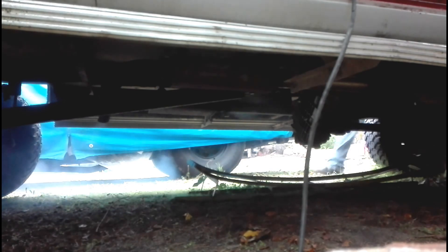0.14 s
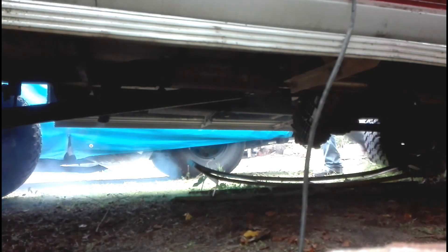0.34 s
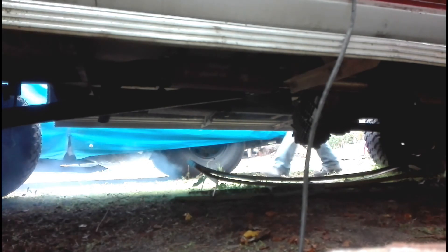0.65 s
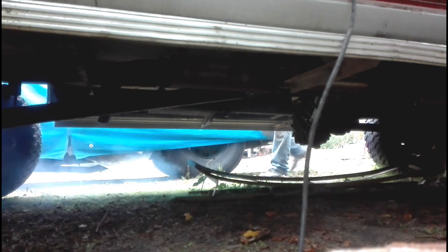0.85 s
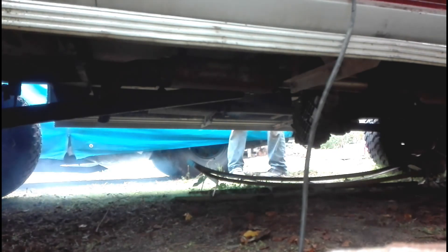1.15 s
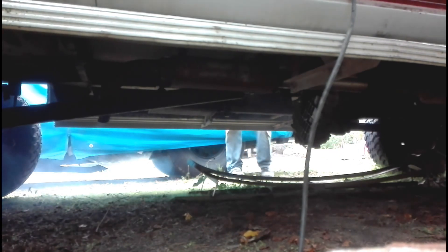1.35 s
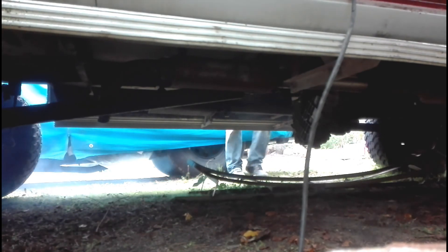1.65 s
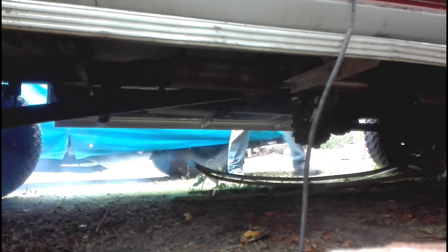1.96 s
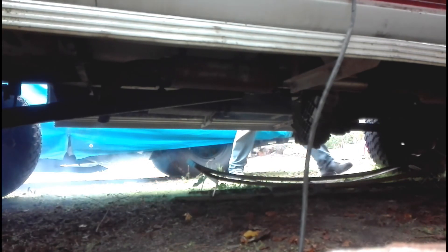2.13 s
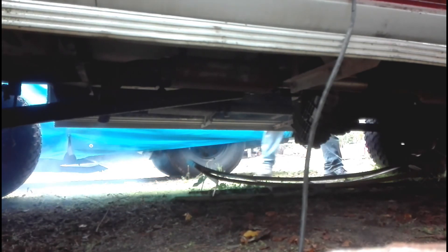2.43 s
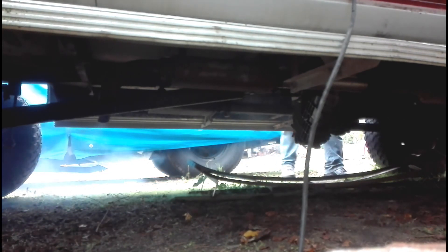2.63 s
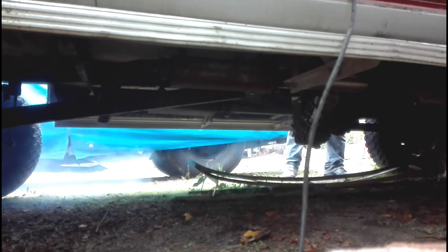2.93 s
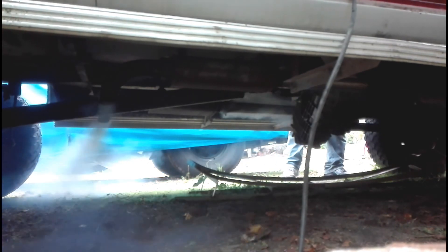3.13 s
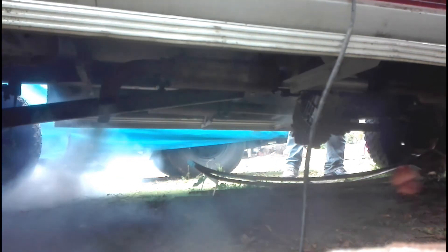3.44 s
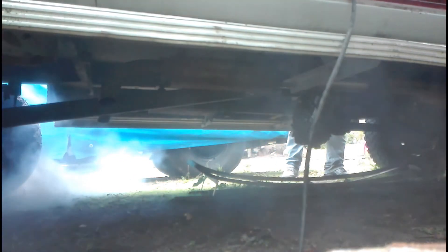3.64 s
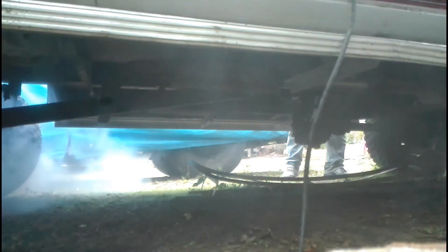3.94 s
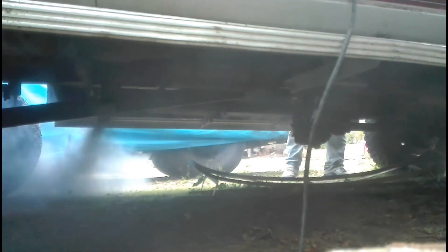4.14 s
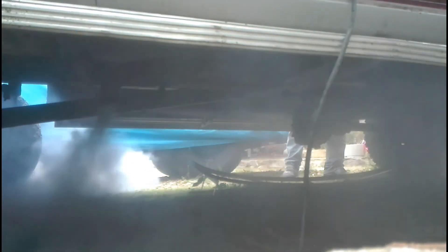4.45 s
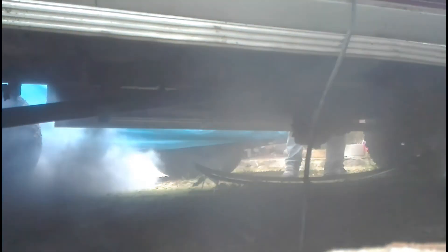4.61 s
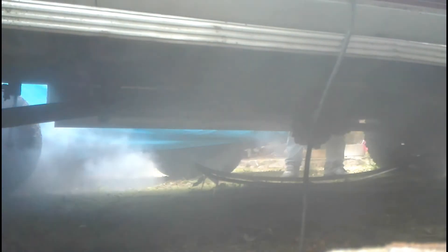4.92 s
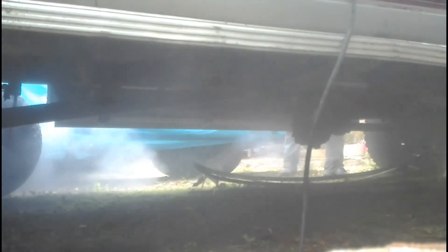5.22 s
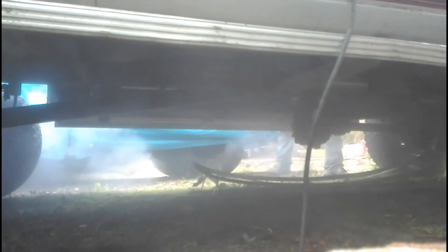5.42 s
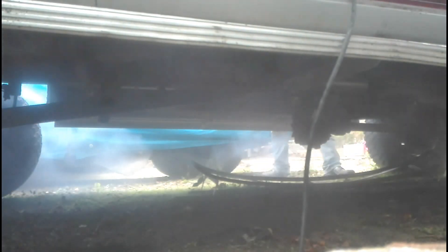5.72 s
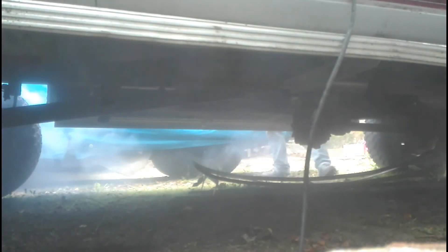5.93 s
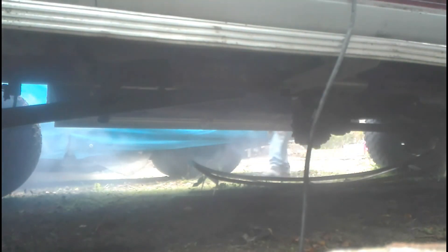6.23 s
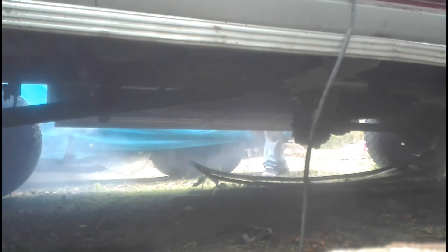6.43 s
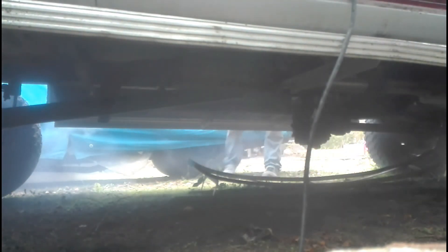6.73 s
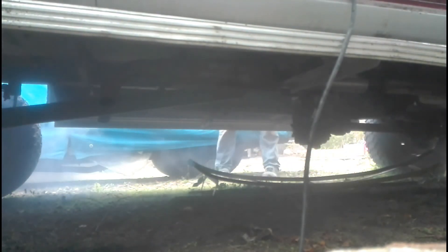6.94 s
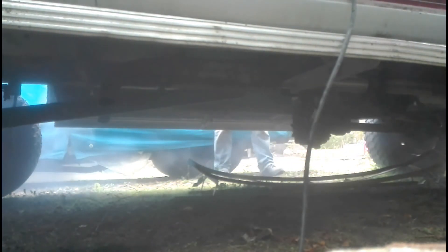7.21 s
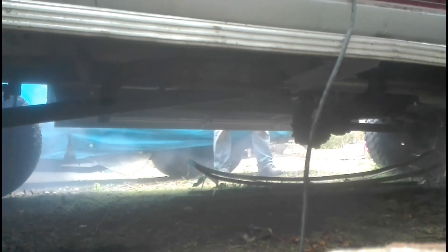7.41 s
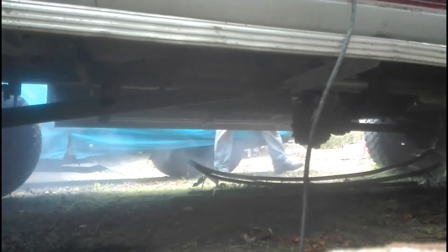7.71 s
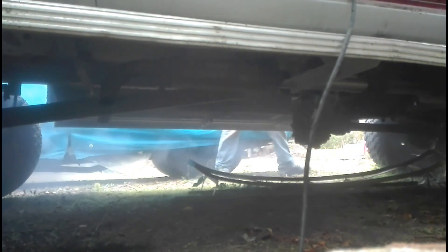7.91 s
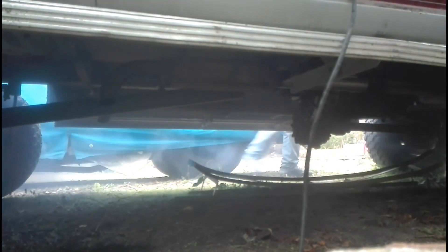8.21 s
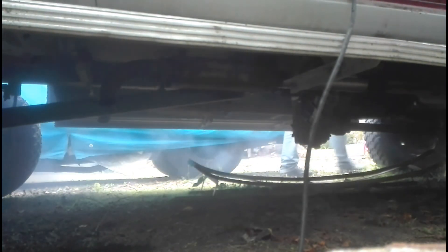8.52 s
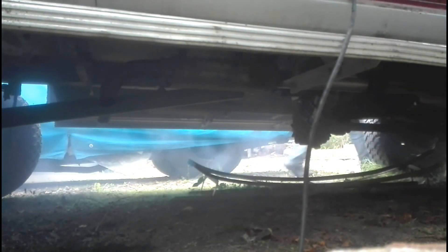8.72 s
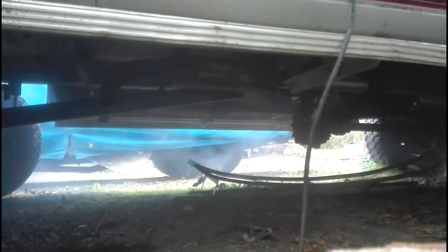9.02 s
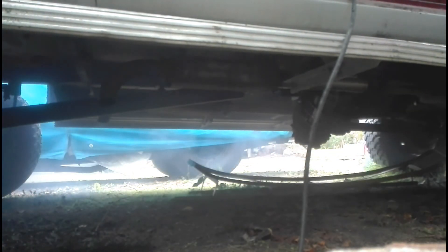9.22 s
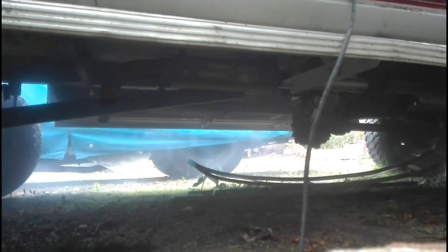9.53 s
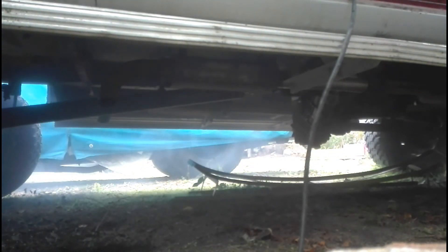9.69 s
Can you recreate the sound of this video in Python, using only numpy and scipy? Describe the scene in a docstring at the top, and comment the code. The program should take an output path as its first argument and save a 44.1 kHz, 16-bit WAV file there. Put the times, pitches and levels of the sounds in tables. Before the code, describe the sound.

A big diesel engine idles outdoors with a deep uneven boom and clatter, is revved hard twice with cracking exhaust, then settles to a quieter idle.

```python
"""A deep, loping boom comes first: a diesel V8 idling outdoors, heard from under the truck and revved twice.
The boom is a tone at the firing rate, made uneven by its cylinders; noise bursts for knocks and ticks ring the
engine at the same places of every cycle. Under throttle, filtered impulses blast from the pipe and shaped noise
hisses; then the engine coasts down on wavering tones and a thin sigh of air.
The blasts push the recorder's gain down and it stays there for seconds, so the last idle sounds quieter."""
import sys
import numpy as np
from scipy import signal
from scipy.fft import rfft, irfft
from scipy.io import wavfile
from scipy.ndimage import uniform_filter1d, minimum_filter1d

SR = 44100
rng = np.random.default_rng(int(sys.argv[2]) if len(sys.argv) > 2 else 0)


def transcribe(signal):
    """Save signal, clipped to [-1, 1], as a 16-bit WAV file at the path in sys.argv[1]."""
    frames = np.atleast_2d(signal).T
    limited = np.clip(frames, -1, 1)
    pcm = np.round(limited * 32767).astype(np.int16)
    wavfile.write(sys.argv[1], SR, pcm)


N = 434826
TIME = np.arange(N) / SR


def gain_of(db):
    """Turns decibels into an amplitude factor."""
    return 10 ** (np.asarray(db) / 20)


def evened(x):
    """Brings a layer to an rms of 1."""
    return x / np.sqrt(np.mean(x ** 2) + 1e-20)


def steadied(x, size=12800):
    """Holds the rms near 1 over a few engine cycles; size is in samples."""
    return x / np.sqrt(abs(uniform_filter1d(x ** 2, size)) + 1e-12)


def curves(rows):
    """The columns of a table, joined by straight lines in time."""
    s, *columns = np.transpose(rows)
    return [np.interp(TIME, s, c) for c in columns]


def ramp(start_s, length_s):
    """Goes from 0 to 1 in a straight line."""
    return np.clip((TIME - start_s) / max(length_s, 1e-3), 0, 1)


def wander(rate_hz):
    """Smooth chance of rms 1: noise that loses its content above rate_hz."""
    size = 2 ** 19
    spectrum = rfft(rng.standard_normal(size))
    smoothing = 1 + (np.fft.rfftfreq(size, 1 / SR) / rate_hz) ** 4
    return evened(irfft(spectrum / smoothing)[:N])


def colour(x, points, modes=(), size=8192):
    """A causal (minimum-phase) filter from a smooth spectrum with resonances on top."""
    hz = abs(np.fft.fftfreq(size, 1 / SR))
    f, db = np.transpose(points)
    gain = gain_of(np.interp(np.log(hz + 1), np.log(f), db))
    for centre, width, peak_db in modes:
        resonance = (gain_of(peak_db) ** 2 - 1) / (1 + (2 * (hz - centre) / width) ** 2)
        gain = gain * np.sqrt(1 + resonance)
    ring = np.fft.ifft(np.exp(np.conj(signal.hilbert(np.log(gain))))).real
    return signal.oaconvolve(x, ring[:size // 2])[:N]


def cut(x, hz, kind, order=4):
    """A Butterworth filter that keeps the low or the high side."""
    sos = signal.butter(order, min(hz, SR / 2 - 1), kind, fs=SR, output="sos")
    return signal.sosfilt(sos, x)


# the governor's idle speed: start_s, speed_firings_per_s
IDLE_SPEED = [(0, 57.28), (.6, 55.4), (2.8, 55.72), (3.8, 52.61), (5.2, 54.3), (7.2, 54.32), (8, 54.72),
              (9.9, 53.37)]
# revs: opens_s, top_speed_s, back_at_idle_s, idle_fuel_returns_s, top_speed_firings_per_s,
# opening_s, closing_s, blast_db
REVS = [(2.92, 3.173, 3.736, 3.76, 130.5, .1, .045, 1), (3.914, 4.348, 5.039, 5.155, 181.7, .07, .1, 0)]
CLIMB_EASE = 1.212  # the climb eases near the top: exponent, 1 = a straight line
# the throttle starts to close this long before top speed; the governor restores fuel within CATCH_S
COAST_LEAD_S, CATCH_S = 0.046, 0.056


def engine():
    """Each rev climbs under throttle and coasts without fuel: speed, throttle 0-1, coasting 0-1, blast force."""
    idle, = curves(IDLE_SPEED)
    speed, pull, coast, force = idle.copy(), *np.zeros((3, N))
    for opens, shuts, idles, fuelled, top, opening, closing, blast_db in REVS:
        climb = 1 - (1 - ramp(opens, shuts - opens)) ** CLIMB_EASE
        fall = 1 - ramp(shuts, idles - shuts)
        speed += (top - idle) * climb * fall
        closed = ramp(shuts - COAST_LEAD_S, closing)
        throttle = ramp(opens, opening) * (1 - closed)
        pull += throttle
        force += gain_of(blast_db) * throttle
        coast += closed * (1 - ramp(fuelled - CATCH_S / 2, CATCH_S))
    return speed, pull, coast, force


# the cylinders in firing order: lead_firing_intervals, idle_push_db, throttle_blast_db
CYLINDERS = [(0.12, 2, -1.5), (0.12, 0, -21), (0.071, 2, -14.5), (0.027, -4.5, 1.5), (0.11, -1.5, -9),
             (0.1, -3, 1), (0.12, 0.3, -6.5), (0.078, -1.9, -20.5)]


def by_cylinder(firings, values):
    """One value for each cylinder, joined smoothly round the cycle."""
    count = len(values)
    smooth = signal.resample(values, count * count * count)
    places = np.linspace(0, count, len(smooth), endpoint=False)
    return np.interp(firings % count, places, smooth, period=count)


def strikes(firings, blows, scatter_db):
    """One impulse for each blow (place in the cycle, dB), in every cycle."""
    out = np.zeros(N)
    for place, db in blows:
        places = place + np.arange(0, firings[-1] - len(CYLINDERS), len(CYLINDERS))
        at = np.minimum(np.searchsorted(firings, places), N - 1)
        out[at] += gain_of(db + scatter_db * rng.standard_normal(N)[:len(at)])
    return out


# resonances of the exhaust pipe: pitch_hz, width_hz, level_db
PIPE_MODES = [(59.6, 75, 8.5), (123, 23, 4), (222, 39, 11.5)]
# exhaust tones while coasting: multiple_of_cycle_rate, level_db (re the firing tone, before the pipe)
COAST_TONES = [(2, -16), (3, -1), (4, -18), (5, -10), (7, -22), (11, -22), (13, -25.5), (14, -21),
               (15, -19.5), (16, -10.5), (17, -13), (18, -18.5), (21, -24)]
COAST_ROUGH = .36  # how much the exhaust tones waver while coasting, 0-1


def boom(firings, speed, coast, overtone_db=-28, coast_db=-2.5):
    """The firing tone lopes; in coasting, tones of the unequal banks swell as they cross the pipe's resonances."""
    lead, push_db, _ = np.transpose(CYLINDERS)

    def pipe(hz):
        """The pipe's gain for a tone."""
        return gain_of(sum(db / (1 + (2 * (hz - centre) / width) ** 2) for centre, width, db in PIPE_MODES))

    lope = gain_of(by_cylinder(firings, push_db)) * (1 + .04 * wander(12))
    turn = 2 * np.pi * (firings + by_cylinder(firings, lead))
    unsteady = wander(12.0)
    tone = np.cos(turn) + gain_of(overtone_db) * np.sin(2 * turn)
    out = pipe(speed) * lope * tone * (1 + coast * COAST_ROUGH / 2 * unsteady)
    for (multiple, db), (phase, shift) in zip(COAST_TONES, rng.random((len(COAST_TONES), 2))):
        ratio = round(multiple) / len(CYLINDERS)
        waver = 1 + COAST_ROUGH * np.roll(unsteady, int(shift * N))
        size = coast * gain_of(db) * pipe(ratio * speed) * waver
        out += size * np.cos(2 * np.pi * (ratio * firings + phase))
    return np.sqrt(2) * gain_of(coast_db * coast) * out / pipe(IDLE_SPEED[1][1])


# the pipe's response to a blast: pitch_hz, level_db
BLAST_PIPE = [(20, -13.5), (40, -8.5), (60, 7.5), (80, 2.5), (105, -4.5), (135, -10), (165, -11.5),
              (195, -16), (235, -13), (300, -23), (350, -35.5), (400, -25.5), (440, -38), (490, -24),
              (600, -38.5), (900, -46), (2000, -59), (5000, -89)]
BLAST_LEAD = 0.12  # a blast leaves this many firing intervals ahead of its cylinder's place


def blasts(exhausts):
    """Under throttle each firing sends a steep pressure front down the pipe."""
    peak = abs(colour(signal.unit_impulse(N), BLAST_PIPE)).max()
    return colour(exhausts, BLAST_PIPE) / peak


# the unevenly spaced firings of each bank thump the pipe:
# place_firing_intervals, centre_pitch_hz, width_firing_intervals, level_db (relative)
THUMPS = [(1, 113, 0.35, -2.5), (2.95, 108, 0.43, 4.5), (4.65, 108, 0.39, 0), (6, 116, 0.19, 0.5),
          (1.45, 221.6, .26, 1.5), (2.5, 222, 0.16, -6.5), (3.4, 222, 0.34, -12.5), (6.5, 222.6, 0.3, 1),
          (7.6, 215, 0.23, -6)]


def thumps(firings, scatter_db, fall):
    """Rounded bursts at the pipe's resonances, at fixed places of the cycle, give the idle its chug and gallop."""
    out = np.zeros(N)
    for place, hz, width, db in THUMPS:
        # distance from the nearest thump, in firing intervals
        away = (firings - place + len(CYLINDERS) / 2) % len(CYLINDERS) - len(CYLINDERS) / 2
        since = TIME - np.interp(firings - away, firings, TIME)
        swell = np.exp(-(away / width) ** 2 / 2)
        out += gain_of(db) * swell * np.cos(2 * np.pi * hz * since * (1 - fall * away))
    return evened(out * gain_of(scatter_db * wander(22)))


# spectrum of the low puffs in the pipe: pitch_hz, level_db (relative)
PUFF_SPECTRUM = [(20, -14), (45, -32), (110, 0), (165, 2.5), (225, 0.5), (290, -2), (370, -6), (415, -5),
                 (445, -10.5), (485, -9.5), (600, -19.5), (900, -9.5), (2000, -75)]
COAST_PUFFS_DB = -14


def puffs(firings, pull, coast, idle_db=-25, pull_db=-17.0, opening=.1, length=0.98, steady=0.79):
    """Each exhaust valve lets out a low, turbulent puff; opening and length are in firing intervals."""
    gate = steady + np.exp(-((firings - opening) % 1) / length)
    size = (1 - pull - coast) * gain_of(idle_db)
    size = size + pull * gain_of(pull_db) + coast * gain_of(COAST_PUFFS_DB)
    return size * evened(colour(gate * rng.standard_normal(N), PUFF_SPECTRUM))


# hard bangs in the exhaust at full throttle: start_s, crack_db, pipe_ring_db (crack relative)
BANGS = [(3.032, -5, -30), (3.064, -9, -26), (3.122, -8, -17), (3.137, -20, -19), (4.072, -7, -28),
         (4.194, -1, -8), (4.246, 1, -7), (4.293, -1, -12)]
# spectrum of their crack: pitch_hz, level_db (relative)
BANG_SPECTRUM = [(60, -11), (150, 0.5), (300, -11), (490, -16), (640, -10), (1000, -2.5), (1350, 8.5),
                 (2200, -9), (5000, -28)]


def bangs(decay_s=0.0039, turbulence=0.55, spike=0.85, spike_s=0.00074, ring_hz=486, ring_s=.012):
    """The fiercest firings crack, a pressure spike in a burst of noise, and leave the pipe ringing hollowly."""
    noise, t = rng.standard_normal(N), TIME[:4096]
    burst, ring = np.zeros((2, N))
    for s, crack_db, ring_db in BANGS:
        part = slice(round(s * SR), round(s * SR) + len(t))
        crack = turbulence * noise[part] * np.exp(-t / decay_s) - spike * np.exp(-t / spike_s)
        burst[part] += gain_of(crack_db) * crack
        ring[part] -= gain_of(ring_db) * np.exp(-t / ring_s) * np.sin(2 * np.pi * ring_hz * t)
    return colour(burst, BANG_SPECTRUM) / np.std(colour(noise, BANG_SPECTRUM)) / 2 + ring


# the pipe's bark under throttle: pitch_hz, level_db (relative)
BARK_SPECTRUM = [(250, -10), (400, -6), (440, -1), (490, 4), (590, -17), (700, -8), (830, 5.5),
                 (1100, -1.5), (1400, 6.5), (2000, 0.5), (3000, -21.5)]
# gas rushing from the pipe: pitch_hz, level_db (relative)
RUSH_SPECTRUM = [(500, -32), (900, 7), (2500, 5.5), (4000, 7.5), (6000, 5.5), (8000, 1.5), (10000, -7.5),
                 (12000, -14.5), (14000, -24)]


def rush(exhausts, spectrum, swell_s=0.0038, steady=0.4, gust_db=1.5):
    """Each blast drags a turbulent jet of gas out of the pipe."""
    t = TIME[:2048]
    jets = evened(signal.oaconvolve(exhausts, t * np.exp(-t / swell_s))[:N])
    gusts = gain_of(gust_db * wander(66))
    return evened(colour((steady + jets) * gusts * rng.standard_normal(N), spectrum))


# the knocks and valve clacks of one cycle:
# place_firing_intervals, low_clank_db, bright_clack_db, tick_db (relative)
KNOCKS = [(.4, -12, -1, -3), (.85, -1, 2, -4), (1.75, 0, 3, -1), (2.25, -4, 1.5, -15), (2.9, -9, -9, -3),
          (3.8, -9, -6, -10), (4.35, -4, -1, -12), (4.7, -4, -1, 0), (5.0, 2, -2, -4), (5.25, -3, 3.5, -4),
          (5.5, -12, 0, -1), (5.85, -7, 3, -1), (6.35, 0, 0, -12), (6.7, -1, -1, -5), (7.2, 1, 1, -7),
          (7.85, -6, 2, -6)]


def knocks(firings, levels_db, decay_s, bed, scatter_db, alike, jitter_s=.0003, rise_s=0.0022, size=1500):
    """Knocks return once a cycle as short bursts, partly the same each time, over a bed of loose rattle."""
    out, t = np.zeros(N + size), np.arange(size) / SR
    alike = np.clip(alike, 0, 1)
    for place, db in zip(np.transpose(KNOCKS)[0], levels_db):
        places = place + np.arange(0, firings[-1], len(CYLINDERS))
        early, force = rng.standard_normal((2, len(places)))
        start_s = np.interp(places, firings, TIME) + jitter_s * early
        starts = np.clip(start_s * SR, 0, N).astype(int)
        same = alike * rng.standard_normal(size)
        bursts = same + np.sqrt(1 - alike ** 2) * rng.standard_normal((len(places), size))
        # a blow excites all frequencies evenly
        bursts = irfft(np.exp(1j * np.angle(rfft(bursts * np.exp(-t / decay_s)))))
        bursts *= gain_of(db + scatter_db * force)[:, None] * (1 - t / t[-1]) * (1 - np.exp(-t / rise_s))
        np.add.at(out, starts[:, None] + np.arange(size), bursts)
    return evened(out[:N]) + bed * rng.standard_normal(N)


# colour of the engine's metal: pitch_hz, level_db (relative)
METAL_SPECTRUM = [(300, -19), (600, -31), (760, -20), (1000, -5.5), (1350, -1), (1750, -3.5), (2150, -2.5),
                  (2650, -15), (3500, -35), (5000, -45), (9000, -49)]
# its resonances: pitch_hz, width_hz, level_db
METAL_MODES = [(786, 35, 6.5), (1055.5, 20, 8.5), (1206, 6.1, 8.5), (1302, 24, 9), (1470, 43, 6),
               (1627, 39, 6), (1735, 35, 7.5), (1773, 20, -9.5), (2845, 22, 2), (3810, 21, 5.5),
               (4150, 47, 6.5), (4450, 48, 3.5), (5910, 36, 4.5), (7100, 110, 2)]


def clatter(firings, split_hz=1450, clack_db=0):
    """Combustion knock and loose parts ring the block and its covers."""
    _, low_db, high_db, _ = np.transpose(KNOCKS)
    clank = knocks(firings, low_db, decay_s=.011, bed=.7, scatter_db=.8, alike=.7)
    clack = knocks(firings, high_db, decay_s=.007, bed=.5, scatter_db=2, alike=.7)
    blows = cut(clank, split_hz, "low", order=8)
    blows = blows + gain_of(clack_db) * cut(clack, split_hz, "high", order=8)
    return steadied(colour(blows, METAL_SPECTRUM, METAL_MODES))


# the hardest knocks of a cycle ring steel covers:
# place_firing_intervals, pitch_hz, swell_s, level_db (relative)
COVER_RINGS = [(4.92, 1304, .005, 0), (6.4, 1304, .005, -7.5), (7.13, 1304, .0045, -2.5),
               (5.25, 1700, .0026, -2.5), (7.26, 1700, .0024, -4.5), (7.87, 1700, .0024, -9)]


def cover(firings, level_db=-5):
    """Hard knocks ring the steel covers, a low stroke and a higher partner; each swells quickly and dies away."""
    t, out = TIME[:2048], np.zeros(N)
    for place, hz, swell_s, db in COVER_RINGS:
        ring = t / swell_s * np.exp(-t / swell_s) * np.sin(2 * np.pi * hz * t)
        out += signal.oaconvolve(strikes(firings, [(place, db)], scatter_db=.7), ring)[:N]
    return gain_of(level_db) * evened(out)


# injector and valve ticks: pitch_hz, level_db (relative)
TICK_SPECTRUM = [(1500, -4), (2600, 4.5), (3800, 0), (5000, -3.5), (6000, -3.5), (8000, -7.5),
                 (10000, -13.5), (12000, -21.5), (14000, -22)]


def ticks(firings, split_hz=4800, loose_db=-6):
    """Injectors and valves tick softly, scattered between ground and chassis, and shake loose parts."""
    levels_db = np.transpose(KNOCKS)[3]
    middle = knocks(firings, levels_db, decay_s=.018, bed=.8, scatter_db=2, alike=.7, rise_s=.004)
    top = knocks(firings, levels_db, decay_s=.016, bed=.95, scatter_db=2.8, alike=.7, rise_s=.004)
    both = cut(middle, split_hz, "low") + cut(top, split_hz, "high")
    valves = evened(colour(both, TICK_SPECTRUM, METAL_MODES))
    return steadied(valves + gain_of(loose_db) * evened(colour(jingle(), TICK_SPECTRUM)))


def jingle(low_hz=2700, high_hz=9500, per_s=9, scatter_db=3, ring_s=0.007, count=30):
    """Small loose parts tick at random moments, each around its own pitch; per_s counts the ticks of one part."""
    t, out = TIME[:1500], np.zeros(N + 1500)
    envelope = (1 - np.exp(-4 * t / ring_s)) * np.exp(-t / ring_s)
    for hz in np.geomspace(low_hz, high_hz, count):
        for when, size, detune in rng.random((400, 3))[:int(per_s * N / SR)]:
            ring = envelope * np.sin(2 * np.pi * hz * (.95 + .1 * detune) * t)
            out[int(when * N):][:len(t)] += gain_of(-scatter_db * np.log(size + .02)) * ring
    return evened(out[:N])


# thin hiss of air while the engine coasts: pitch_hz, level_db (relative)
SIGH_SPECTRUM = [(3000, 6), (5000, 1), (6300, 0), (7000, -2), (7800, -3), (10000, -4), (14000, -15)]


def sigh():
    """Steady turbulent noise with an airy spectrum."""
    return evened(colour(rng.standard_normal(N), SIGH_SPECTRUM))


# a sharp snap as the engine falls back, a shoe scuffing the ground:
# start_s, level_db (before the high-pass), length_s (the snap's is its decay)
SNAP, SCUFF = (4.4265, 10, .0002), (7.62, -38, .07)


def small_sounds(snap_hz=1900, scuff_hz=3000):
    """One dry snap, a decaying spike, and one soft scuff, a swell of noise; both are high-passed."""
    s, db, length = SNAP
    snap = -gain_of(db) * (TIME >= s) * np.exp(-abs(TIME - s) / length)
    s, db, length = SCUFF
    swell = np.sin(np.pi * np.clip((TIME - s) / length, 0, 1))
    scuff = gain_of(db) * swell * evened(colour(rng.standard_normal(N), RUSH_SPECTRUM))
    return cut(snap, snap_hz, "high", order=2) + cut(scuff, scuff_hz, "high", order=2)


def spread(x, above_hz=5300, side_db=-4.8, flutter_hz=250):
    """Treble scattered under the truck reaches the two microphones differently."""
    flutter = np.sqrt(2) * np.cos(np.pi * wander(flutter_hz))
    side = gain_of(side_db) * cut(x * flutter, above_hz, "high", order=8)
    return np.array([x + side, x - side])


# layer gains: idle_db, throttle_db, throttle_rise_db_per_doubling, coast_db, coast_rise_db_per_doubling
# (doublings of speed)
BOOM_LAW = (-14, -11.5, 6, -24.5, 10.5)
CLATTER_LAW = (-30.5, -26.5, 4.5, -31, 5)
HISS_LAW = (-46.5, -27, 0, -48, 8.5)


def loudness(law, speed, pull, coast):
    """A layer's gain follows the throttle and, off idle, grows with speed where its law has a rise."""
    idle_db, pull_db, pull_rise_db, coast_db, coast_rise_db = law
    doublings = np.log2(speed / IDLE_SPEED[0][1])
    level_db = (1 - pull - coast) * idle_db
    level_db = level_db + pull * (pull_db + pull_rise_db * doublings)
    return gain_of(level_db + coast * (coast_db + coast_rise_db * doublings))


CLEARED_DB = -1.5  # once revved clear, the engine knocks and ticks a little more softly


def scene(boom_db=0, blast_db=4, sigh_db=-1, thump_db=-21.0, clatter_db=-1.07, loaded_db=-2,
          bark_db=-5, coast_bark=0.26, ticks_db=5, rush_db=2.0):
    """Crank speed times every engine layer; fuel turns the idle into a roar or a coasting hum."""
    speed, pull, coast, force = engine()
    low, mid, high = (loudness(law, speed, pull, coast) for law in (BOOM_LAW, CLATTER_LAW, HISS_LAW))
    _, shuts, idles, *_ = REVS[-1]
    cleared = gain_of(CLEARED_DB * ramp(shuts, idles - shuts))
    mid, high = mid * cleared, high * cleared
    firings = np.cumsum(speed) / SR  # running count of firings
    blows = [(k - BLAST_LEAD, row[2]) for k, row in enumerate(CYLINDERS)]
    exhausts = strikes(firings, blows, scatter_db=0.93)

    exhaust = gain_of(boom_db) * (1 - pull) * boom(firings, speed, coast) + puffs(firings, pull, coast)
    exhaust += gain_of(blast_db) * force * blasts(exhausts)
    exhaust += gain_of(thump_db) * (1 - pull - coast) * thumps(firings, scatter_db=1.5, fall=0.05)

    metal = gain_of(clatter_db + loaded_db * pull) * (clatter(firings) + (1 - coast) * cover(firings))
    bark = gain_of(bark_db) * (pull + coast_bark * coast) * rush(exhausts, BARK_SPECTRUM)

    hiss = gain_of(ticks_db) * np.sqrt(1 - pull) * ticks(firings)
    hiss += gain_of(rush_db) * np.sqrt(pull) * rush(exhausts, RUSH_SPECTRUM)
    hiss += gain_of(sigh_db) * coast * sigh()
    return spread(low * exhaust + mid * (metal + bark) + high * hiss + bangs() + small_sounds())


def gain_control(x, ceiling_db=-13.5, attack_s=0.16, hold_s=5.16, recover_db_per_s=5):
    """Turns down whatever exceeds the ceiling, holds that gain for seconds, then lets it creep back."""
    keep = np.exp(-1 / (attack_s * SR))
    power = signal.lfilter([1 - keep], [1, -keep], (x ** 2).mean(0))
    over_db = np.maximum(10 * np.log10(power + 1e-12) - ceiling_db, 0)
    size = int(hold_s * SR)
    # the largest excess of the last hold_s
    held_db = -minimum_filter1d(-over_db, size, mode="constant", origin=(size - 1) // 2)
    creep_db = recover_db_per_s * TIME
    return x * gain_of(creep_db - np.maximum.accumulate(held_db + creep_db))


EDGE_HZ = 14300  # upper band limit


def record(dry, low_cut_hz=22):
    """The microphone drops the deepest bass, gain control acts, peaks past full scale clip; then the band limit."""
    heard = signal.sosfiltfilt(signal.butter(2, low_cut_hz, "high", fs=SR, output="sos"), dry)
    edge = signal.firwin(511, EDGE_HZ, window=("kaiser", 9), fs=SR)
    return signal.oaconvolve(np.clip(gain_control(heard), -1, 1), edge[None], "same")


dry = scene()
out = record(dry)
transcribe(out)
```